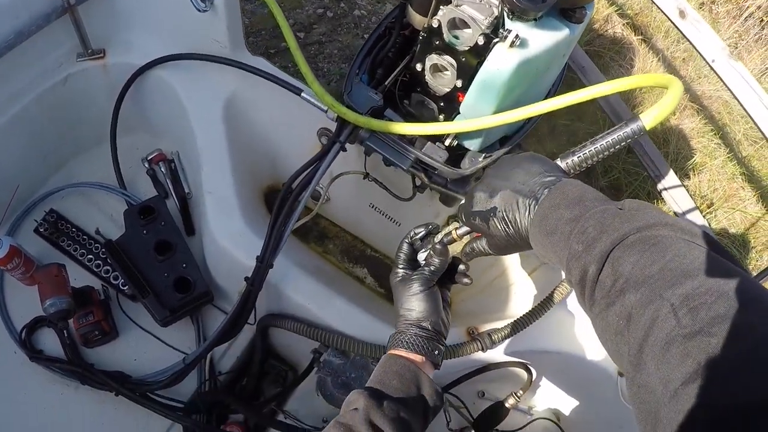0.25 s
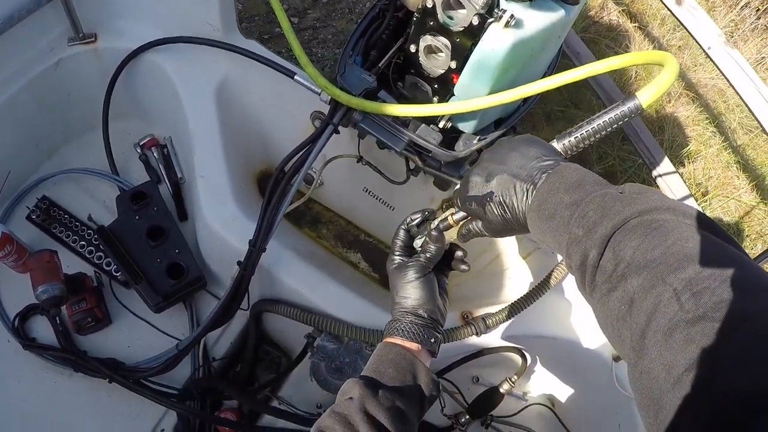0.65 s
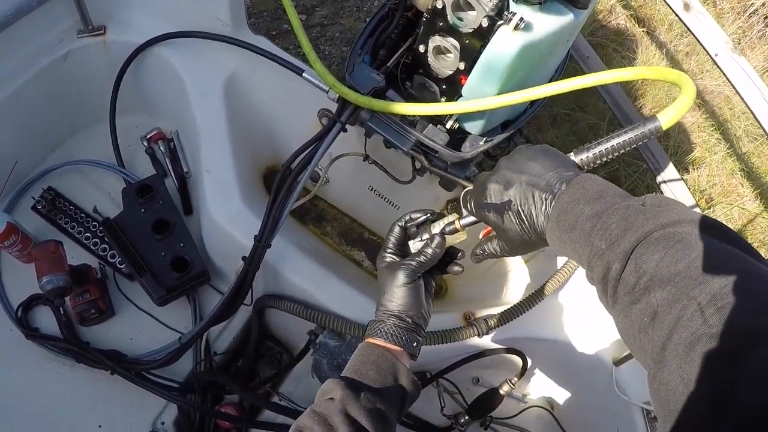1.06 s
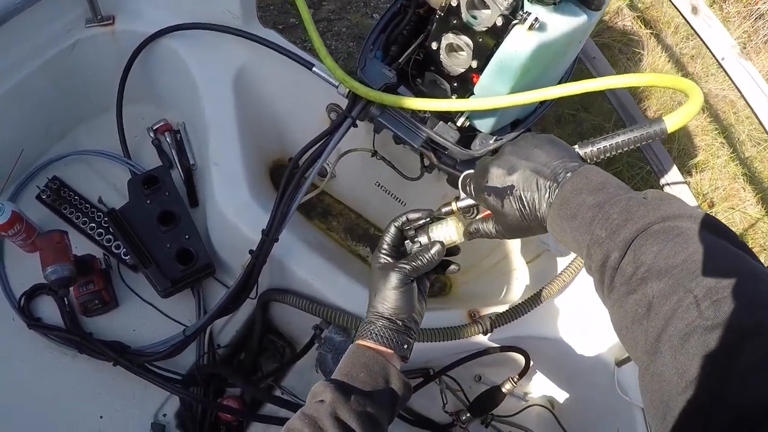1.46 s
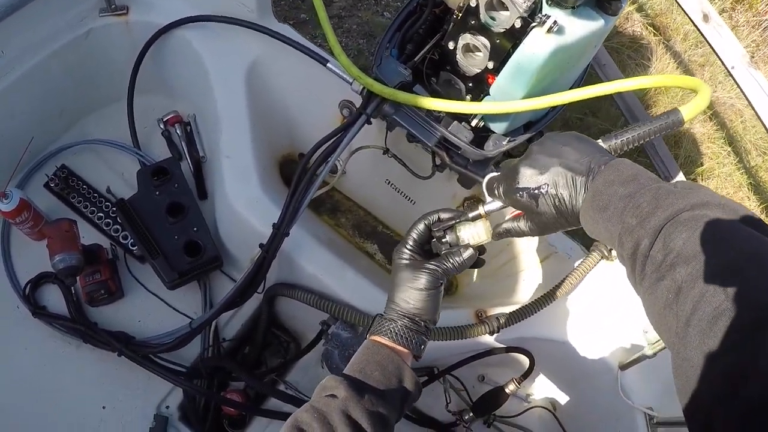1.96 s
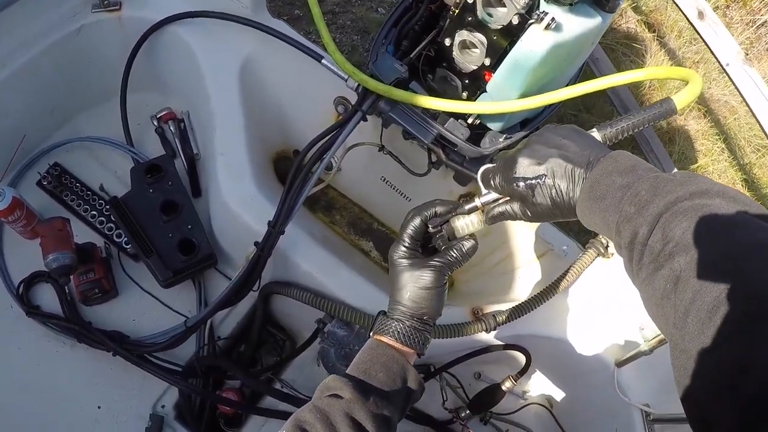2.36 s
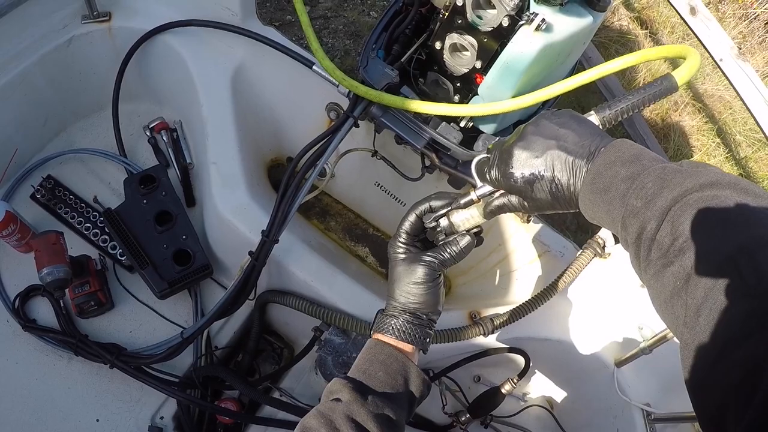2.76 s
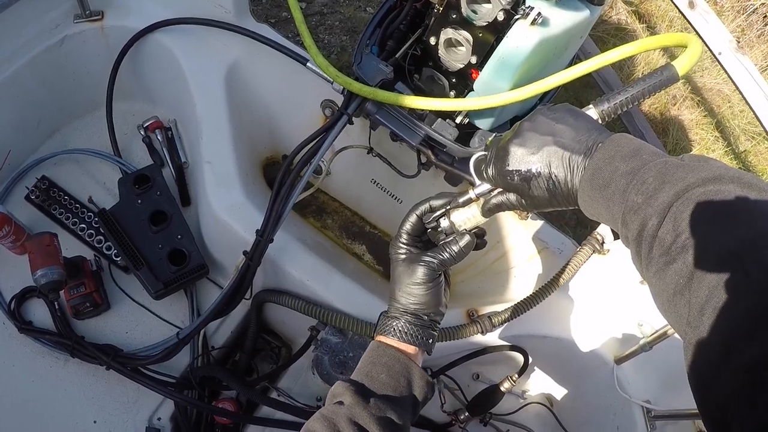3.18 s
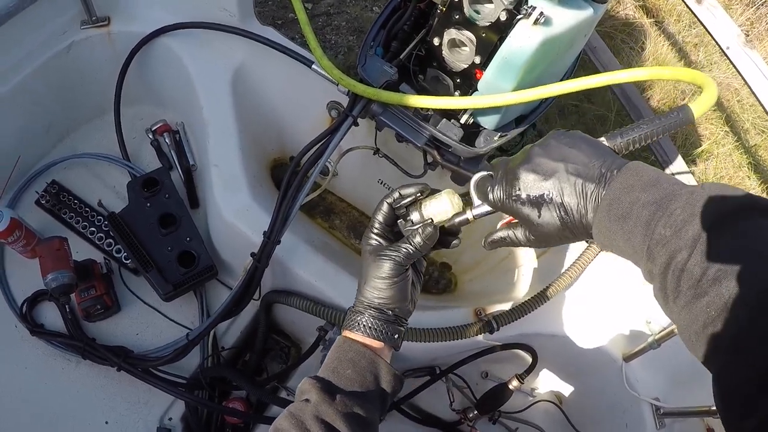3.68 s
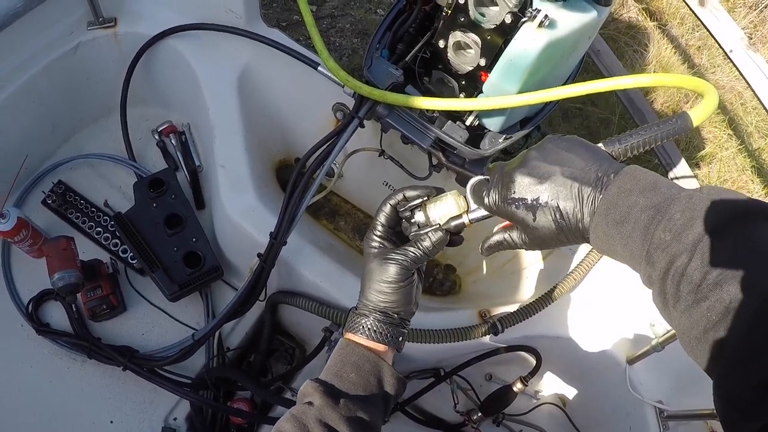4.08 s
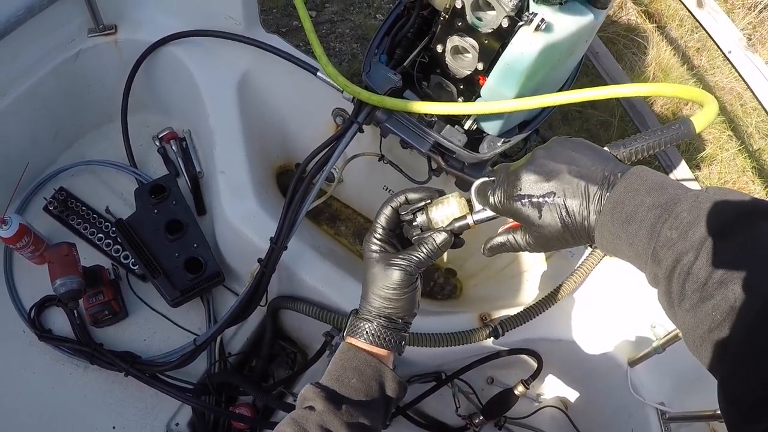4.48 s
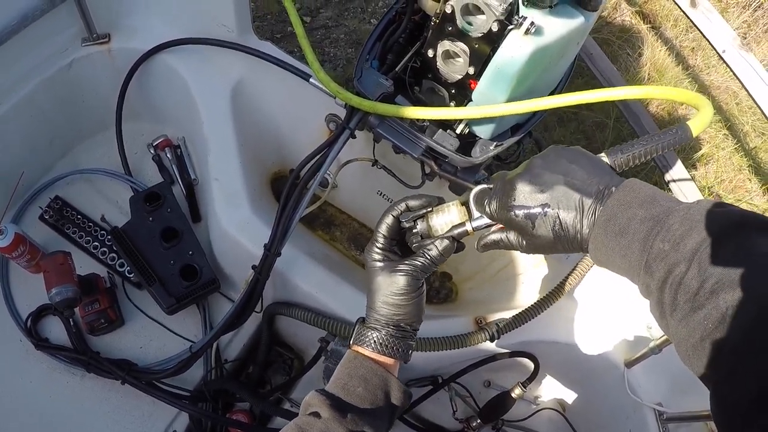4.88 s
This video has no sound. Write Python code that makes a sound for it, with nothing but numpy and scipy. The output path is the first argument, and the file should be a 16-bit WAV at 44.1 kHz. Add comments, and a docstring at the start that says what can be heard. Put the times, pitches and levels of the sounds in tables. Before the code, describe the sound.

Close, outdoor sound in an open boat from a head-worn microphone, alike in both channels. At 0 s a compressed-air blast is already under way: a loud, harsh hiss with whistly resonances around 2.5 to 4 kHz and bright treble, slightly unsteady, with short hull reflections. Wind rumbles, flutters and thumps heavily on the microphone during this first second. At about 1.05 s the jet snaps off, leaving faint outdoor hush, a low distant motor hum, a very thin leak of air and soft hiss wisps around 1.5 to 1.7 s. Near 2 s a second blast opens quickly, dips in level, then shifts colour at about 2.5 s, becoming stronger and brighter until its abrupt stop near 3.5 s. The leak's sizzle is then clearer, with small wind puffs around 3.8 and 4.6 s. At about 4.8 s a third blast, rougher and fuller in low roar, swells up and is still blowing at the end, about 5.1 s.

```python
"""In an open boat, close to a head-worn microphone, a mechanic blows out a small fuel part with an air gun.
A blast is already under way: a noise jet, coloured by resonances of part and glove and by echoes off the hull.
Wind rumbles and flutters on the microphone, strongest in the first second; a motor hums far off in the hush.
The blast stops after a second and a thin leak of filtered noise is left, with a few short wisps of hiss.
A second blast shifts its aim midway; after more leaking a third begins and is still blowing at the end."""
import sys
import numpy as np
from scipy import signal
from scipy.fft import rfft, irfft
from scipy.io import wavfile
from scipy.ndimage import uniform_filter1d, map_coordinates

SR = 44100
rng = np.random.default_rng(int(sys.argv[2]) if len(sys.argv) > 2 else 0)


def materialize(psi):
    """Save the field psi as 16-bit PCM at rate SR to the path in sys.argv[1].

    A 1-D psi becomes a single channel; in a 2-D psi each row is a channel.
    """
    bounded = np.clip(np.atleast_2d(psi).T, -1, 1)
    quanta = np.round(bounded * 32767).astype(np.int16)
    wavfile.write(sys.argv[1], SR, quanta)


N = 226656
T = np.arange(N) / SR  # s
FREQ = np.maximum(np.fft.rfftfreq(N, 1 / SR), 1)  # Hz


def undb(db):
    """Decibels to gain."""
    return 10 ** (np.asarray(db) / 20)


def curves(rows):
    """The columns of a table, joined by straight lines in time."""
    s, *columns = np.transpose(rows)
    return [np.interp(T, s, column) for column in columns]


def colour(points):
    """A spectrum in dB, joined on a log-frequency axis."""
    hz, db = np.transpose(points)
    return np.interp(np.log(FREQ), np.log(hz), db)


def lifts(peaks):
    """Bell-shaped resonances, in dB over frequency."""
    return sum(db * np.exp(-2 * ((FREQ - hz) / width) ** 2) for hz, width, db in peaks)


def noise(db):
    """Random-phase noise with the given spectrum."""
    phase = 2 * np.pi * rng.random(len(FREQ))
    return irfft(undb(db) * np.exp(1j * phase), N)


def band_rms(x, lo_hz, hi_hz):
    """Strength of x inside one band."""
    inside = (FREQ > lo_hz) & (FREQ < hi_hz)
    return np.std(irfft(rfft(x) * inside, N))


def lowpass(x, hz):
    """Smooth split without delay."""
    return irfft(rfft(x) / (1 + (FREQ / hz) ** 8), N)


def walk(rate):
    """Slow chance of spread 1, moving up to about rate times a second."""
    x = irfft(rfft(rng.standard_normal(N)) / (1 + (FREQ / rate) ** 4), N)
    return x / np.std(x)


def swell(s, half_s):
    """A bell-shaped rise and fall around time s."""
    return np.exp(-((T - s) / half_s) ** 2)


def sway(x, shift):
    """Read x a little faster and slower: its spectral peaks wander by about this share."""
    position = np.cumsum(1 + shift * walk(2.5))
    return map_coordinates(x, [position], order=3, mode="wrap")


def hull(x, echo_db, sway_s, near_s=.0035, far_s=.02, count=14):
    """Short echoes off gloves, engine and hull; the paths change as head and hands sway."""
    out = x.copy()
    for lag in np.geomspace(near_s, far_s, count):
        delay = lag * rng.uniform(.9, 1.1) + sway_s * walk(1.2)
        echo = map_coordinates(x, [(T - delay) * SR], order=3, mode="wrap")
        sign = rng.choice([-1, 1])
        # longer paths come back weaker
        out += sign * undb(echo_db) * (near_s / lag) ** 0.5 * echo
    return out * np.std(x) / np.std(out)


CRACK_DB = -47  # the jet as the valve cracks open, against full flow
TREBLE_LAG = 0.25  # extra dB that the treble lacks for each dB of flow still missing
CLOSE_DB_PER_S = 1326  # the spring snaps the valve shut
SURGE_DB, SURGE_LEAD_S, SURGE_S = 1, 0.025, 0.035  # swell just before the stop: height, lead, half-length


def valve(start, opening_s, end):
    """One pull in dB, as (flow, treble against it): the valve eases open, the treble last; it surges and snaps shut."""
    still_closed = np.maximum(1 - (T - start) / opening_s, 0)
    opening_db = CRACK_DB * still_closed ** 2
    surge_db = SURGE_DB * swell(end - SURGE_LEAD_S, SURGE_S)
    closing_db = surge_db - CLOSE_DB_PER_S * np.maximum(T - end, 0)
    return opening_db + closing_db, TREBLE_LAG * opening_db


# turbulence of the free jet: (frequency [Hz], relative level [dB])
JET_COLOUR = [(60, -17), (150, -10.5), (400, -7), (900, -6.5), (1950, -11.5), (4500, -0.5), (8800, -12.0),
              (11800, -16), (15000, -14.5)]
WAVER_DB, WAVER_RATE = .5, 9.9  # unsteady hands: spread of the middle band's level, changes per second


def blast(pull, flow, cavities, flutter_db, wander):
    """Jet turbulence, lifted by the cavities it hits; trigger and aim set its level, the nozzle's drift its colour."""
    level_db, treble_db, roar_db = curves(flow)
    valve_db, lag_db = valve(*pull)
    # the hands never hold quite still, so the cavities change size
    air = sway(noise(colour(JET_COLOUR) + lifts(cavities)), wander)
    air = hull(air, echo_db=-22.0, sway_s=.00004)

    roar = lowpass(air, 1840)
    treble = air - lowpass(air, 4840)
    body = air - roar - treble

    out = body / band_rms(air, 2200, 6000) * undb(WAVER_DB * walk(WAVER_RATE))
    out += undb(treble_db + lag_db) * treble / band_rms(air, 6000, 15000)
    out += undb(roar_db) * roar / band_rms(air, 700, 1900)
    return out * undb(level_db + valve_db + flutter_db * walk(40))


# pulls of the trigger: (valve cracks open [s], time to open fully [s], let go [s])
TRIGGER_PULLS = [(-.2, .09, 1.046), (1.98, 0.093, 3.488), (4.793, 0.077, 5.4)]
# the nozzle drifting over the part, for each aim:
# (time [s], jet level [dB], treble against it [dB], roar around 1 kHz against it [dB])
FLOW_FIRST = [(0, -20.5, -5.7, -17), (.15, -19.8, -5, -15.5), (.33, -21.5, -5, -15), (.48, -20, -3.5, -15),
              (.96, -21, -2.5, -12.5)]
FLOW_SECOND = [(2.12, -19.5, -8.5, -14), (2.21, -25, -7.5, -13), (2.5, -25, -6.5, -12.5)]
FLOW_SECOND_SLID = [(2.55, -22, -3.5, -11), (2.82, -20, -2, -12.5), (2.93, -22, -2, -11),
                    (3.07, -19, -4, -14.5), (3.4, -19.5, -4.5, -14.5)]
FLOW_THIRD = [(4.87, -22.5, -4.5, -7), (5.14, -21.5, -6, -6)]
# cavities of part and glove that each aim excites: (frequency [Hz], width [Hz], lift [dB], below 0 a notch)
CAVITIES_FIRST = [(1600, 680, 5.5), (2663, 710, 14), (3250, 310, 5), (4050, 950, 10.5), (6380, 1770, 9),
                  (8060, 770, 5), (9360, 310, 7), (10600, 4400, 8.5)]
CAVITIES_SECOND = [(1500, 580, 8.5), (2650, 880, 12.5), (4090, 960, 9), (5320, 650, 5.5), (7200, 2200, 5.5),
                   (10100, 1100, 4), (11800, 1100, -0.5), (13400, 2050, 5.5)]
CAVITIES_SECOND_SLID = [(1420, 530, 7.3), (2497, 810, 13.5), (3660, 750, 9.4), (5260, 1570, 7.7),
                        (7410, 1650, 8.6), (9800, 1830, 11.2), (12640, 4000, 9.3)]
CAVITIES_THIRD = [(1360, 590, 9.7), (2405, 690, 12.4), (3530, 570, 5.7), (5190, 270, 1.5), (7630, 640, 2.3),
                  (10340, 1300, 7.7), (12710, 1840, 4.7)]
# narrow edge tones of the first aim: (frequency [Hz], width [Hz], lift [dB])
EDGE_TONE_PEAKS = [(4230, 110, 3), (2980, 75, 3), (5140, 81, 4.5), (5970, 73, 1.5), (7440, 70, 5.5),
                   (8120, 120, 1), (10550, 400, 3), (12450, 600, 1.5)]
SLIDE_AT_S, SLIDE_S = 2.52, 0.089  # the nozzle slides to another aim: middle of the slide, how long


def gun():
    """Three blasts; in the second the nozzle slides from one aim to another, as a crossfade of two jets."""
    first, second, third = TRIGGER_PULLS
    first_peaks = list(CAVITIES_FIRST) + list(EDGE_TONE_PEAKS)
    slide = np.clip((T - SLIDE_AT_S) / SLIDE_S + .5, 0, 1)
    out = blast(first, FLOW_FIRST, first_peaks, flutter_db=0.5, wander=0.0029)
    before = blast(second, FLOW_SECOND, CAVITIES_SECOND, flutter_db=0.2, wander=0.00665)
    after = blast(second, FLOW_SECOND_SLID, CAVITIES_SECOND_SLID, flutter_db=0.7, wander=.006)
    out += before * np.sqrt(1 - slide) + after * np.sqrt(slide)
    return out + blast(third, FLOW_THIRD, CAVITIES_THIRD, flutter_db=0.74, wander=0.0068)


# strength of the wind on the microphone, before gusts and trim: (time [s], rumble level [dB])
WIND_STRENGTH = [(0, -20.5), (.55, -20), (.95, -22), (1.15, -26.5), (1.56, -26), (1.74, -38), (1.9, -27.5),
                 (2.26, -26.5), (2.4, -29.5), (2.85, -36.5), (5.14, -37)]
# gusts on top of the wind: (time [s], half-length [s], rumble lift [dB], flutter lift [dB])
GUST_LIFTS = [(0.206, 0.028, 9, 7.5), (0.415, 0.12, -0.5, 13), (0.622, 0.073, 0, 5.5), (0.755, 0.018, 5, 5),
              (.885, .028, 5, 9.5), (1.39, 0.026, 1, 6), (1.94, 0.034, 6.5, 8), (2.595, .025, 8.5, 13.5),
              (3.052, 0.019, 11, 2), (3.267, .03, 9, 10), (3.83, 0.056, 5.5, 0), (4.614, 0.022, 8, 18)]
# small eddies before gusts and trim: level at this wind, and dB more per dB of wind
FLUTTER_DB, FLUTTER_WIND_DB, FLUTTER_GROWTH = -32.5, -20, 1.5
FLUTTER_PATCHY_DB = 1.0  # the small eddies come and go by chance


def gusting():
    """Levels of large and small eddies in dB: both follow the wind, the small ones more steeply, plus gusts."""
    rumble_db = curves(WIND_STRENGTH)[0]
    flutter_db = FLUTTER_DB + FLUTTER_GROWTH * (rumble_db - FLUTTER_WIND_DB)
    flutter_db = flutter_db + FLUTTER_PATCHY_DB * walk(10)
    for s, half_s, rumble_lift_db, flutter_lift_db in GUST_LIFTS:
        gust = swell(s, half_s)
        rumble_db = rumble_db + rumble_lift_db * gust
        flutter_db = flutter_db + flutter_lift_db * gust
    return rumble_db, flutter_db


def eddies(points, steady_s):
    """Low turbulence whose own slow swells are evened out, so that the gusts set its strength."""
    x = noise(colour(points))
    power = uniform_filter1d(x ** 2, int(steady_s * SR))
    return x / np.sqrt(uniform_filter1d(power, int(steady_s * SR / 2)))


# spectra of the large and the small eddies: (frequency [Hz], relative level [dB])
RUMBLE_COLOUR = [(8, -31), (16, 1.5), (28, 4), (45, 4), (80, -2.5), (115, -11), (170, -19), (400, -90)]
FLUTTER_COLOUR = [(60, -20), (110, 2.5), (200, -5.5), (300, -12), (450, -17.5), (700, -26), (1500, -66),
                  (6000, -95)]
# single eddies that strike the port: (time [s], frequency [Hz], peak level [dB], half-length [s])
PORT_BUFFETS = [(0.194, 42, -17, 0.01), (0.337, 84.5, -12, 0.011), (0.446, 200, -9.5, 0.0041),
                (0.451, 65, -10, 0.011), (0.5, 45, -10.5, 0.011), (0.541, 45.7, -9, 0.011),
                (0.562, 253, -8.5, 0.00315), (0.567, 49.7, -8, 0.009), (0.867, 130, -15.5, 0.0056),
                (0.897, 36, -9, 0.018), (1.036, 55, -14, 0.011), (2.092, 33.5, -15, 0.015),
                (2.272, 30, -16, 0.025)]


def wind():
    """Large eddies rumble, small ones flutter in the stronger gusts; a few thump the port."""
    rumble_db, flutter_db = gusting()
    out = eddies(RUMBLE_COLOUR, steady_s=0.071) * undb(rumble_db - 2.5 + 0.78 * walk(32))
    small = eddies(FLUTTER_COLOUR, steady_s=0.041)
    # the smallest eddies gain further on the others as the flutter strengthens, up to a limit
    coarse = lowpass(small, 208)
    fine_db = 0.43 * np.minimum(flutter_db + 21, 6)
    small = coarse + (small - coarse) * undb(fine_db)
    # in light air all the small eddies fall away quickly
    light_air = 1 + undb(-41 - flutter_db) ** 2
    out += small * undb(flutter_db + 0.5) / light_air
    for s, hz, db, half_s in PORT_BUFFETS:
        thump = np.cos(2 * np.pi * (hz * (T - s) + rng.random()))
        out += undb(db) * swell(s, half_s) * thump
    return out


# open air: (frequency [Hz], relative level [dB])
YARD_COLOUR = [(25, -2.5), (60, -2), (110, -14.5), (200, -20), (400, -18.5), (850, -20), (1100, -26.5),
               (2200, -28.5), (4000, -34), (7000, -41.5), (10000, -45), (12000, -50), (15000, -58)]
# level of the hush as heard, lower around the blasts and then recovering: (time [s], level against YARD_DB [dB])
HUSH_LEVEL = [(0, -6), (1.08, 0), (1.3, 1.5), (2, -0.5), (3.52, -3), (3.95, -0.5), (5.14, -1)]
YARD_DB = -50  # between 280 and 3200 Hz
# the distant motor: (multiple of its turning rate, level [dB rms])
MOTOR_HARMONICS = [(2, -43.5), (6, -59.5), (7, -64), (8, -70.5), (10, -65), (11, -66), (14, -75)]
MOTOR_HZ = 36.43  # mean turning rate


def yard():
    """Outdoor hush, heard lower around the blasts, and the slightly wavering hum of a far motor."""
    air = noise(colour(YARD_COLOUR))
    air_db = YARD_DB + curves(HUSH_LEVEL)[0] + 0.5 * walk(5.4)
    air *= undb(air_db) / band_rms(air, 280, 3200)
    turns = np.cumsum(MOTOR_HZ * (1 + 0.0046 * walk(3.2))) / SR
    hum = 0
    for multiple, db in MOTOR_HARMONICS:
        tone = np.sin(2 * np.pi * (round(multiple) * turns + rng.random()))
        hum = hum + undb(db + 0.93 * walk(3.1)) * tone
    return air + np.sqrt(2) * hum  # rms to peak


# air seeping from the closed gun: (time [s], hiss level [dB], high sizzle level [dB])
SEEP_LEVELS = [(1.1, -63, -65), (1.5, -70.5, -74), (1.9, -64, -65), (3.55, -58, -62.5), (4.05, -55, -63),
               (4.7, -59, -62.5)]
# spectra of the hiss and the sizzle: (frequency [Hz], relative level [dB])
HISS_SPECTRUM = [(2500, -36), (3800, -10), (4400, -2.5), (5000, -1.5), (5700, -4), (6500, -3.5),
                 (7700, -16), (11000, -30)]
SIZZLE_SPECTRUM = [(5000, -35), (7900, -4), (8400, 0), (9600, 0), (11000, -18), (15000, -16)]
# narrow peaks in the spectrum of the leak: (frequency [Hz], width [Hz], lift [dB])
LEAK_PEAKS = [(4650, 80, 1.5), (4980, 130, 4.5), (5310, 70, 3), (8470, 100, 4)]
SEEP_WANDER = .004  # share by which the peaks of the leak drift


def leak():
    """A thin hiss and a higher sizzle of seeping air, each wavering, with drifting peaks, combed by the hull."""
    out = 0
    for points, db in zip((HISS_SPECTRUM, SIZZLE_SPECTRUM), curves(SEEP_LEVELS)):
        hiss = sway(noise(colour(points) + lifts(LEAK_PEAKS)), SEEP_WANDER)
        hiss = hull(hiss, echo_db=-14, sway_s=.00002)
        out = out + hiss / np.std(hiss) * undb(db + 0.95 * walk(13))
    return out


# thin hisses, the valve seat singing as it cracks open and gloves brushing the part:
# (time [s], frequency [Hz], width [Hz], rms level at the crest [dB], spread in time [s])
HISS_WISPS = [(1.47, 3600, 700, -63, .04), (1.518, 3080, 700, -59, 0.026), (1.7, 3600, 400, -63, 0.037),
              (2.008, 4200, 350, -48, .012), (4.82, 3480, 450, -52, .016), (4.828, 2600, 400, -56, .009)]


def wisps():
    """Short swells of narrow hiss from valve seat and gloves."""
    out = 0
    for s, hz, width, db, spread_s in HISS_WISPS:
        hiss = noise(-20 * np.log10(1 + (2 * (FREQ - hz) / width) ** 2))
        rise_and_fall = np.exp(-((T - s) / spread_s) ** 2 / 2)
        out = out + hiss / np.std(hiss) * undb(db) * rise_and_fall
    return out


def scene():
    """Everything reaches one microphone, the same in both channels."""
    mono = gun() + wind() + yard() + leak() + wisps()
    return np.array([mono, mono])


TOP_HZ = 15300


def record(dry):
    """A steep low-pass leaves hardly anything above TOP_HZ."""
    return signal.sosfilt(signal.ellip(12, .1, 85, TOP_HZ, fs=SR, output="sos"), dry)


dry = scene()
out = record(dry)
materialize(out)
```